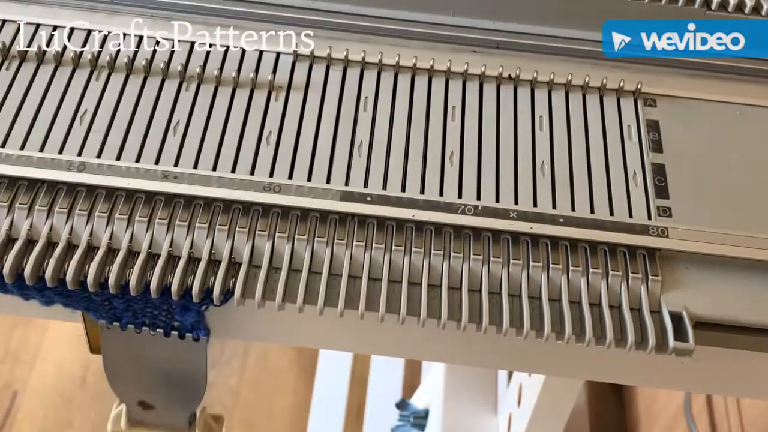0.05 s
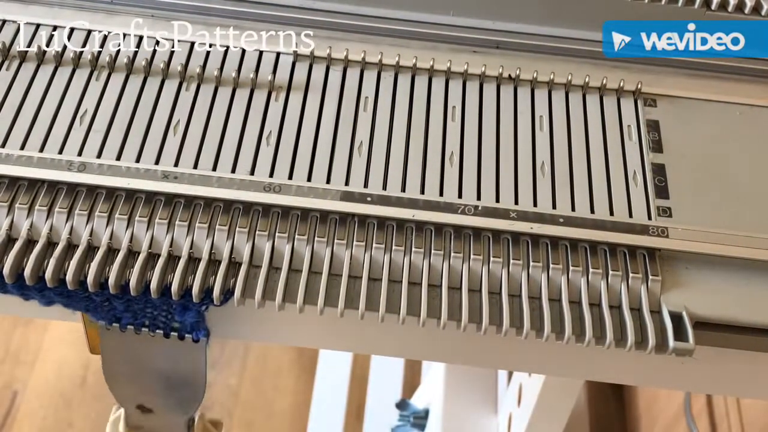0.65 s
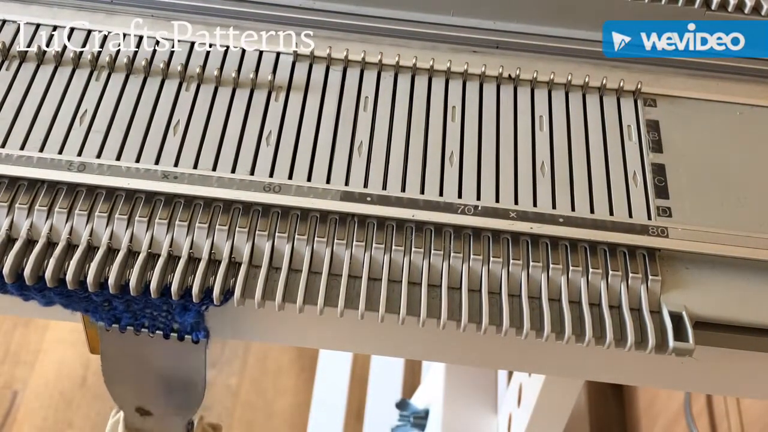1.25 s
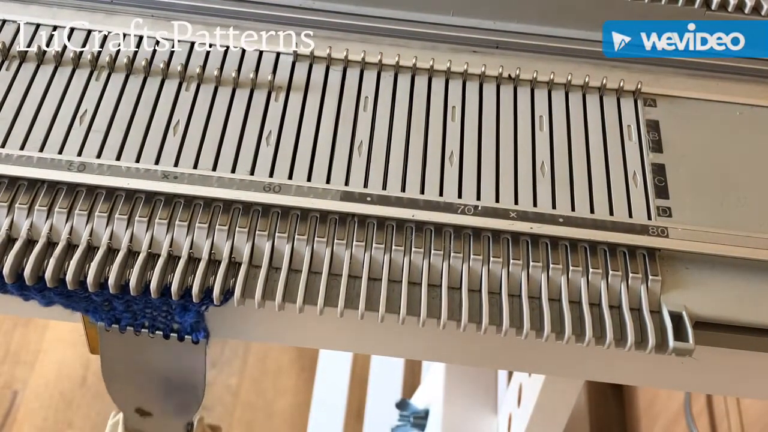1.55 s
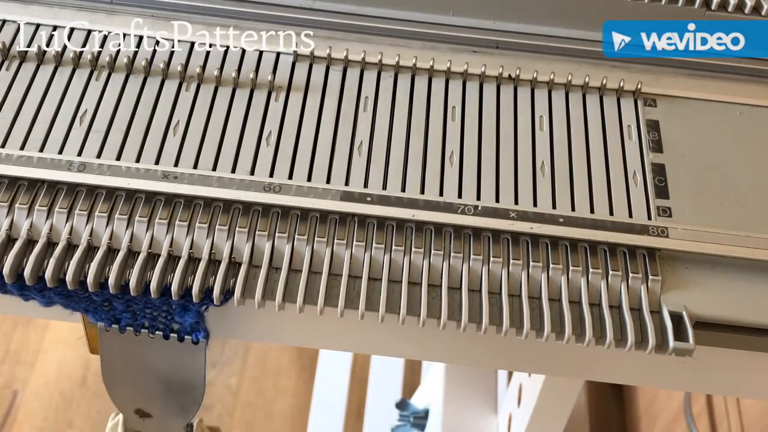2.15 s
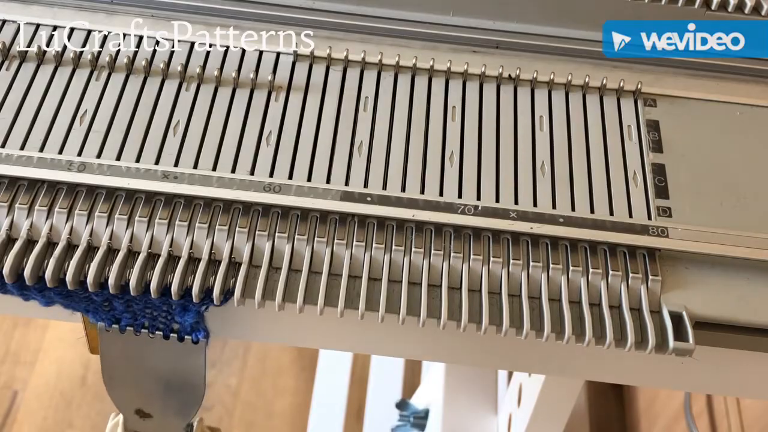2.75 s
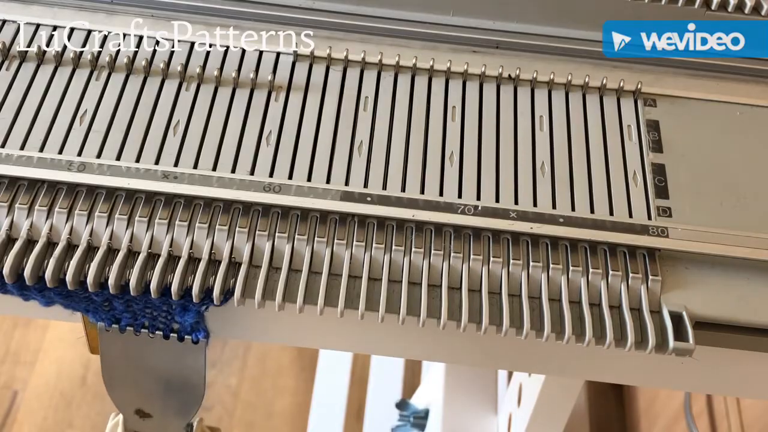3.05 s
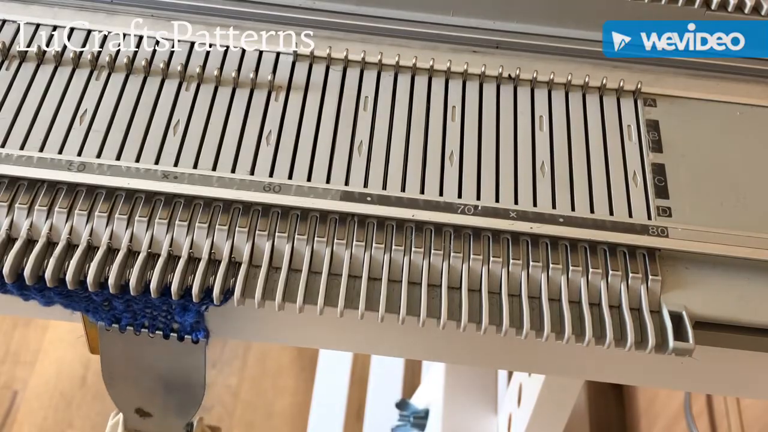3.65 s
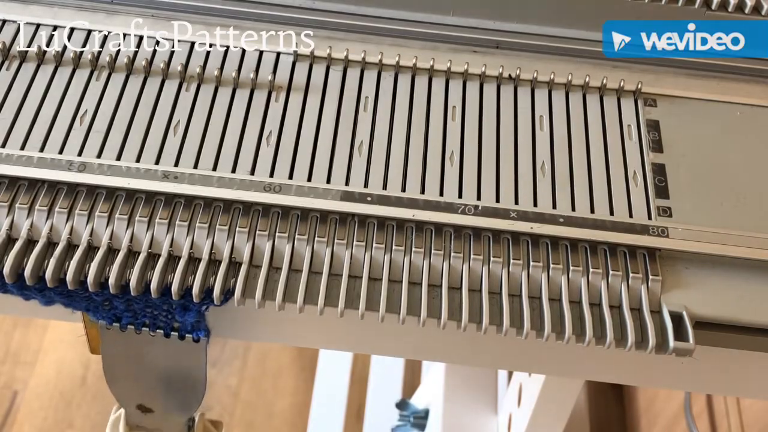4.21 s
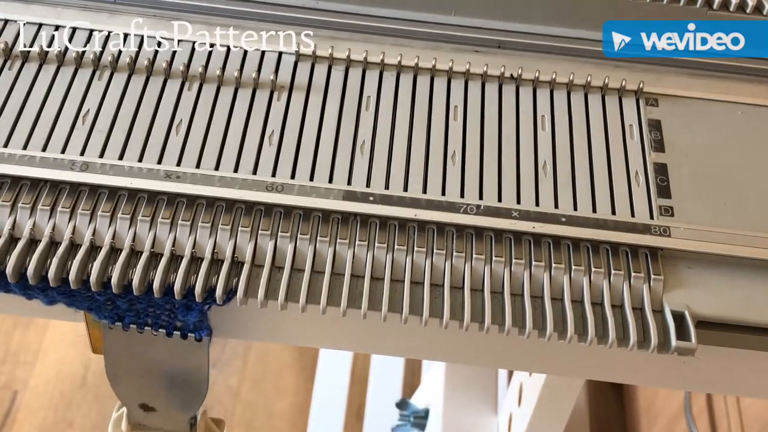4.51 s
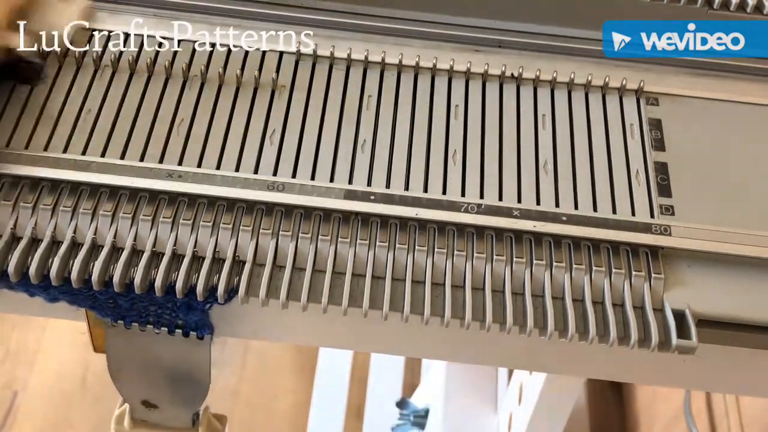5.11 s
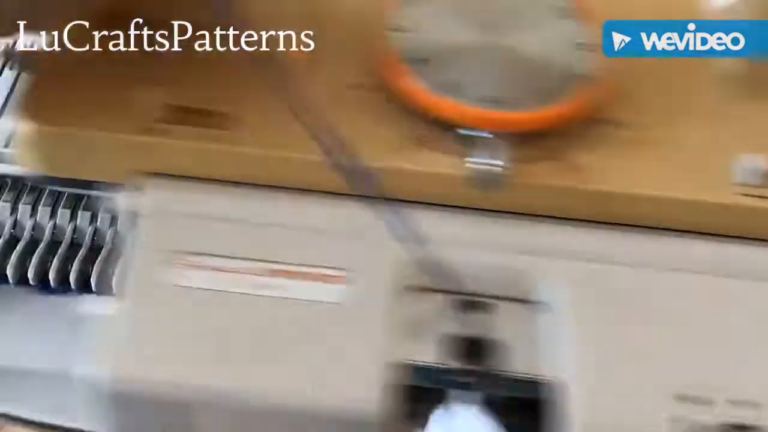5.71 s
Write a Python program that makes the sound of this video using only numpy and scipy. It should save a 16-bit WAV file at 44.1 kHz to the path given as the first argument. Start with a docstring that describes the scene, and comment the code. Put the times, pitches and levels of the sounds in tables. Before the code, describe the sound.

Heard from close up in a quiet room, a knitting machine is handled with faint sliding sounds and irregular little steel clicks from its needles. Near the end comes the loudest part: the carriage rasps over the needles twice, the second push shorter, while the hollow bed drones and the stand rumbles beneath. It finishes with a sharp click, a soft bump and a tiny metallic ping.

```python
"""A small, quiet room, one microphone close to a flatbed knitting machine. Hands shift and rub on the
machine, and steel latch needles rattle and click against a tool and their slots, knocking the hollow
bed. Then the carriage is pushed along in two strokes: its cams scrape over the row of needle butts,
the needles sing, and the bed drones under it while the stand rumbles."""
import sys
import numpy as np
from scipy import signal
from scipy.fft import rfft, irfft, next_fast_len
from scipy.io import wavfile
from scipy.ndimage import uniform_filter1d, map_coordinates

SR = 44100
rng = np.random.default_rng(int(sys.argv[2]) if len(sys.argv) > 2 else 0)


def digitize_waveform(pressure):
    """Quantize a signal to 16-bit integers and store it at the path in sys.argv[1].

    Rows of a 2-D input are taken as channels; values are limited to [-1, 1].
    """
    field = np.atleast_2d(pressure).T
    bounded = np.clip(field, -1, 1)
    quanta = np.round(bounded * 32767).astype(np.int16)
    wavfile.write(sys.argv[1], SR, quanta)


N = 263277


def amp(db):
    """Decibels to gain."""
    return 10 ** (np.asarray(db) / 20)


def unit(x):
    """Scale to rms 1."""
    return x / np.sqrt(np.mean(x ** 2) + 1e-20)


def along(points, hz):
    """Read a curve of (frequency_hz, value) points on a log-frequency axis."""
    point_hz, values = np.transpose(points)
    return np.interp(np.log(hz + 1), np.log(point_hz), values)


def hump(hz, centre_hz, height_db, width):
    """Gain of a broad bell on a log-frequency axis."""
    return amp(height_db * np.exp(-(np.log((hz + 1) / centre_hz) / width) ** 2))


def resonance(hz, centre_hz, width_hz):
    """Gain of a single resonance, 1 at its centre."""
    return 1 / np.sqrt(1 + ((hz - centre_hz) * 2 / width_hz) ** 2)


def peaks(hz, modes):
    """A flat gain with a peak at each (pitch_hz, width_hz, height_db)."""
    return 1 + sum((amp(db) - 1) * resonance(hz, centre, width) ** 2 for centre, width, db in modes)


def filtered(x, response):
    """Pass x through a complex response of frequency."""
    padded = next_fast_len(len(x) + 8192)
    hz = np.fft.rfftfreq(padded, 1 / SR)
    return irfft(rfft(x, padded) * response(hz), padded)[:len(x)]


def coloured(x, spectrum):
    """Shape x by a spectrum, at rms 1."""
    return unit(filtered(x, lambda hz: amp(along(spectrum, hz))))


def ring(force, modes):
    """A body rings in its modes, scaled so that a white force keeps its power."""
    def response(hz):
        total = sum((-1) ** k * amp(db) * 1j * hz * width / (pitch ** 2 - hz ** 2 + 1j * hz * width)
                    for k, (pitch, width, db) in enumerate(modes))
        return total / np.sqrt(np.mean(np.abs(total) ** 2))
    return filtered(force, response)


def grit(size, per_s):
    """Micro-impacts of uneven strength, at rms 1."""
    hits = rng.random(size) < per_s / SR
    return unit(hits * rng.choice([-1, 1], size) * amp(2.5 * rng.standard_normal(size)))


def wobble(knots_per_s):
    """A smooth random curve."""
    knots = rng.standard_normal(int(N * knots_per_s / SR) + 4)
    return map_coordinates(knots, [np.arange(N) * knots_per_s / SR])


def held(start_s, end_s, attack_s=0.021, release_s=0.018):
    """Envelope of a movement: it rises before the start, holds, and dies after the end."""
    t = np.arange(N) / SR
    return np.exp(-np.maximum(start_s - t, 0) / attack_s - np.maximum(t - end_s, 0) / release_s)


def movements(rows):
    """One gain curve for each level column of a (start_s, length_s, level_db, ...) table."""
    starts, lengths, *levels_db = np.transpose(rows)
    shapes = np.array([held(start, start + length) for start, length in zip(starts, lengths)])
    return amp(levels_db) @ shapes


def room_tone():
    """The quiet air of the room, mostly low noise."""
    # spectrum of the air: frequency_hz, relative_db
    air_spectrum = [(15, -59), (25, -17), (65, -7), (130, -6.5), (174, -3), (300, -10), (600, -15.5),
                    (1500, -24.5), (4000, -29), (10000, -33), (15800, -30.5)]
    return amp(-69.5) * coloured(rng.standard_normal(N), air_spectrum)


def room(x):
    """Add the small room's diffuse tail: in each band the stored energy dies at its own speed."""
    # reverberation times: frequency_hz, t60_s
    decay_times = [(120, 0.62), (800, 0.29), (2000, 0.33), (5000, 0.31), (13000, 0.15)]
    hz, t, spectra = signal.stft(x, SR, nperseg=256)
    lag_s = t[t < .6]
    build_up = 1 - np.exp(-lag_s / 0.0041)
    decay = (amp(-60 * lag_s / along(decay_times, hz)[:, None]) * build_up) ** 2
    decay /= decay.sum(axis=1, keepdims=True)
    energy = signal.fftconvolve(np.abs(spectra) ** 2, decay, axes=1)[:, :len(t)]
    scatter = signal.stft(rng.standard_normal(N), SR, nperseg=256)[2]
    band_gain = np.sqrt(np.abs(energy) / np.mean(np.abs(scatter) ** 2))
    tail = signal.istft(band_gain * scatter, SR, nperseg=256)[1]
    return x + amp(-5.5) * tail[:N]


def hands():
    """Hands slide, rub and bump on the machine; gives hiss, force on the bed, force on the stand."""
    # hands and carriage shifting against the machine: start_s, length_s, rub_rel_db, bump_rel_db
    rubs = [(0.02, 0.016, -78, -55), (0.118, 0.075, -55.5, -45), (0.39, 0.037, -52, -50),
            (0.49, 0.14, -59.5, -61.5), (0.8, 0.093, -67, -73), (0.93, 0.034, -61, -60),
            (1.06, 0.048, -65.5, -66), (2.26, 0.041, -61.5, -63), (3.885, 0.018, -59.5, -44.5),
            (4.17, 0.099, -63, -72), (4.262, 0.014, -50.5, -39), (5.12, 0.032, -57, -46),
            (5.185, 0.012, -64, -41.5), (5.66, 0.069, -51, -42.5), (5.77, 0.09, -41, -44.5),
            (5.9, 0.022, -57, -41)]
    # smooth slides along the bed and its rail: start_s, length_s, level_db
    slides = [(0.16, 0.062, -64.5), (0.42, 0.31, -74.5), (0.765, 0.14, -62.5), (1.07, 0.08, -74.5),
              (4.21, 0.054, -62.5), (5.19, 0.033, -63), (5.245, 0.065, -47.5), (5.76, 0.11, -47.5)]
    # spectrum of sliding surfaces: frequency_hz, relative_db
    hiss_spectrum = [(40, -70), (600, -22), (1600, -2), (2800, 2), (4400, 2.5), (7000, -1.5), (11000, -5.5),
                     (15800, -9)]
    rub, bump = movements(rubs)
    hiss = movements(slides)[0] * coloured(rng.standard_normal(N), hiss_spectrum)
    on_bed = amp(-5) * rub * grit(N, per_s=3000)
    on_stand = amp(-8) * bump * grit(N, per_s=1400)
    return np.array([hiss, on_bed, on_stand])


def needle_ring(size, ring_hz, ring_db):
    """A touched needle rings at one mode, with a cluster above it and its own scatter of weak ones."""
    # spectrum of a steel click: frequency_hz, relative_db
    steel_spectrum = [(40, -70), (300, -5), (900, 1.5), (1700, 0.5), (4500, -0.5), (7000, -1.5),
                      (11000, -5.5), (15800, -8.5)]
    ripple_db, spacing_hz = 3, 220.4

    def response(hz):
        mode = 1 + max(amp(ring_db) - 1, 0) * resonance(hz, ring_hz, width_hz=600) ** 2
        cluster = hump(hz, 1.35 * ring_hz, .7 * ring_db, width=.3) - 1
        scatter = map_coordinates(rng.standard_normal(400), [hz / spacing_hz], mode="wrap")
        return amp(along(steel_spectrum, hz)) * (mode + cluster) * amp(ripple_db * scatter)
    return unit(filtered(grit(size, per_s=8000), response))


def needle_clicks():
    """Each touch is a short, soft-edged steel click; gives steel sound, force on bed, force on stand."""
    # needles meeting tool and slots: peak_s, steel_db, knock_rel_db, edge_s, ring_hz, ring_db, knock_hz
    touches = [(0.125, -70, -52, 0.01, 3500, -5, 353), (0.243, -62, -69, .012, 10500, 7, 400),
               (0.334, -53, -53.5, 0.014, 3800, -2, 302), (0.365, -56.5, -58, 0.014, 3200, 6, 600),
               (0.535, -65.5, -71, .022, 4200, 3, 900), (0.628, -61.5, -53.5, 0.0086, 4500, -1, 338),
               (0.68, -63.5, -78, .012, 9400, 10, 800), (1.269, -38.5, -34.5, 0.011, 11200, 8, 1010),
               (1.867, -69, -63.5, .009, 7600, 3, 1320), (2.077, -77, -67, 0.013, 11000, 6, 500),
               (2.213, -72, -69, .008, 7700, 6, 785), (2.331, -47, -68, 0.0096, 7030, 21, 800),
               (2.365, -67, -40, 0.0068, 6800, 0, 660), (2.443, -56, -54, 0.011, 6800, 0, 800),
               (2.499, -52.5, -48.5, .011, 7200, 5, 1000), (2.529, -50.5, -43, 0.0094, 5100, -1, 815),
               (2.656, -48.5, -47, 0.011, 4280, 1.5, 790), (2.702, -55.5, -56.5, 0.0083, 11100, 7, 1100),
               (2.911, -72.5, -72, .007, 11500, 14, 800), (3.102, -61, -55.5, 0.007, 3400, 6, 590),
               (3.22, -72, -74, 0.0097, 11300, 13, 800), (3.476, -73, -63, 0.013, 6200, 2, 800),
               (3.676, -50.5, -44.5, 0.0093, 7500, 0, 540), (3.691, -47.5, -55, .009, 7770, 17, 815),
               (3.73, -52, -39, 0.0076, 6000, -8, 550), (3.755, -46.5, -54, 0.0085, 3670, 5.5, 400),
               (3.83, -56.5, -48, 0.0077, 3400, 5, 586), (3.997, -66, -74, 0.0097, 14500, 17, 800),
               (4.067, -52, -45.5, 0.0077, 2320, 11.5, 570), (4.288, -34.5, -43, 0.011, 7300, 7.5, 716),
               (4.351, -35.5, -41, 0.0064, 10500, 1, 600), (4.379, -38.5, -27, 0.0077, 1500, 14, 1440),
               (4.565, -37, -34.5, .013, 7000, -3, 600), (5.487, -34, -26, 0.0083, 9000, 6, 890),
               (5.693, -31, -38.5, .007, 4400, 8, 800), (5.855, -47.5, -60, .006, 3400, 37, 900)]
    bed_share_db = -11.5
    size = SR // 2
    t = (np.arange(size) - size // 2) / SR
    layers = np.zeros((3, N + size))
    for peak_s, steel_db, knock_db, edge_s, ring_hz, ring_db, knock_hz in touches:
        envelope = np.exp(1 - np.sqrt(1 + (t / edge_s) ** 2))
        steel = needle_ring(size, ring_hz, ring_db)
        # bed and stand take the blow at the peak of the click
        blow = np.exp(-(t / (1.84 * edge_s)) ** 2)
        knock = filtered(blow * grit(size, per_s=4400),
                         lambda hz: hump(hz, knock_hz, height_db=10, width=0.54))
        thud = filtered(blow * grit(size, per_s=4000),
                        lambda hz: hump(hz, knock_hz / 2.88, height_db=7.5, width=0.45))
        stand_share_db = -9 - 7.5 * np.log2(knock_hz / 557)  # more for soft, low blows
        span = slice(round(peak_s * SR), round(peak_s * SR) + size)
        layers[0, span] += amp(steel_db) * envelope * steel
        layers[1, span] += amp(knock_db + bed_share_db) * knock
        layers[2, span] += amp(knock_db + stand_share_db) * thud
    return layers[:, size // 2:][:, :N]


def pushed(full_db, growth):
    """Gain of a carriage layer: full_db at a full push, changing by growth dB for each dB of push."""
    # the two carriage strokes, each a curve of the push: time_s, push_db
    strokes = [
        [(4.31, -49), (4.368, -36), (4.602, -36.5), (4.658, -28), (4.78, -26.5), (4.87, -31.5), (5.012, -28),
         (5.074, -36.5), (5.13, -69)],
        [(5.34, -49), (5.382, -32), (5.42, -25.5), (5.462, -25), (5.528, -28.5), (5.594, -27), (5.624, -30.5),
         (5.66, -45), (5.675, -48)],
    ]
    full_push_db = -28
    t = np.arange(N) / SR
    gain = np.zeros(N)
    for stroke in strokes:
        time_s, push_db = np.transpose(stroke)
        excess_db = np.interp(t, time_s, push_db) - full_push_db
        gain += held(time_s[0], time_s[-1]) * amp(full_db + growth * excess_db)
    return gain


def passing_needles(x, ripple_db=1.8):
    """Narrow resonances come and go in x as needle after needle passes the cams."""
    spectra = signal.stft(x, nperseg=512)[2]
    scatter = uniform_filter1d(rng.standard_normal(spectra.shape), size=2, axis=0)
    scatter = uniform_filter1d(scatter, size=12, axis=1)
    rippled = spectra * amp(ripple_db * unit(scatter))
    return unit(signal.istft(rippled, nperseg=512)[1][:N])


def cam_scrape():
    """The steel cams drag over many needle butts at once and ring with the tiny impacts."""
    # spectrum of the scrape: frequency_hz, relative_db
    scrape_spectrum = [(40, -72), (300, -18), (900, 5), (1600, -1.5), (2600, -3.5), (4800, -2),
                       (7300, -4.5), (10500, -4.5), (12700, -1), (14000, -4), (15800, -3.5)]
    # resonances of the needles, heard in the scrape: pitch_hz, width_hz, height_db
    needle_modes = [(2310, 97, 4.5), (3090, 79, 4), (3620, 140, 4), (6530, 300, 1), (12700, 180, -2)]
    scrape = coloured(grit(N, per_s=12000), scrape_spectrum)
    ringing = filtered(scrape, lambda hz: peaks(hz, needle_modes))
    return pushed(full_db=-27.5, growth=1.15) * passing_needles(ringing)


def singing_needles():
    """Under the carriage, many needles sing at nearly the same high mode."""
    # flares as the first stroke ends and the second begins: start_s, length_s, level_db
    flares = [(5.0, 0.056, -43.5), (5.39, 0.068, -45)]
    gain = pushed(full_db=-45, growth=1.4) + movements(flares)[0]
    singing = filtered(rng.standard_normal(N), lambda hz: resonance(hz, 9000, width_hz=900) ** 2)
    return gain * unit(singing)


def carriage():
    """The carriage rides over the needles; gives steel sound, force on the bed, force on the stand."""
    # resonances of its hollow shell: pitch_hz, width_hz, height_db
    shell_modes = [(420, 23, 3.7), (785, 55, 5), (920, 40, 5), (1265, 22, 1.9), (1630, 50, 3.5)]
    drag = amp(.8 * wobble(knots_per_s=45))  # uneven as needles enter and leave
    steel = drag * cam_scrape() + singing_needles()
    shell = filtered(grit(N, per_s=2300), lambda hz: peaks(hz, shell_modes))
    clatter = pushed(full_db=-35.5, growth=0.75) * drag * shell
    # its weight shakes the stand's lowest modes
    weight = filtered(grit(N, per_s=1900), lambda hz: hump(hz, centre_hz=68, height_db=4, width=0.3))
    rumble = pushed(full_db=-40.5, growth=0.33) * weight
    return np.array([steel, clatter, rumble])


def bed_and_stand(on_bed, on_stand):
    """The hollow needle bed and its stand ring with the forces on them."""
    # strong modes of the bed: pitch_hz, width_hz, relative_db
    bed_modes = [(178.2, 9.5, 9.5), (241, 33, -2.5), (374.7, 20.6, 0), (430, 37, 1), (510.3, 53, 1.5),
                 (618.3, 29, 2.5), (722, 108, -2.5), (817, 19, 2.5), (927, 36, -2), (1008.5, 24, 4.5),
                 (1056, 56, -0.5), (1149.6, 24, 1), (1290, 154, -7.5), (1548, 69, -3.5), (1660, 26, -4.5),
                 (1817, 23, -14), (1885, 130, -9), (3104, 75, -11.5)]
    # spectrum of the bed's many weak modes in between: frequency_hz, relative_db
    panel_spectrum = [(20, -50), (100, -9), (300, 4), (900, -1.5), (1500, -10), (3000, -2), (8000, -14)]
    # modes of the stand: pitch_hz, width_hz, relative_db
    stand_modes = [(58.5, 21, -16.5), (74, 9.9, -10), (127.2, 14.3, 1), (179.6, 10.6, -1.5), (265, 56, -8)]
    panels = amp(1) * filtered(on_bed, lambda hz: amp(along(panel_spectrum, hz)))
    return ring(on_bed, bed_modes) + panels + ring(on_stand, stand_modes)


def scene():
    """Needles, carriage and hands all ring the same bed and stand, close up over the room tone."""
    layers = needle_clicks() + carriage() + hands()
    steel, on_bed, on_stand = [room(layer) for layer in layers]
    machine = steel + bed_and_stand(on_bed, on_stand)
    return (amp(1) * machine + room_tone())[None]


def record(dry):
    """One small microphone: it loses the deepest bass, and the treble ends at a steep band limit."""
    low_cut_hz, top_hz = 30, 15830

    def response(hz):
        low_cut = hz ** 2 / (hz ** 2 + low_cut_hz ** 2)
        high_cut = .5 - .5 * np.tanh((hz - top_hz) / 40)
        return low_cut * high_cut
    return filtered(dry[0], response)[None]


dry = scene()
out = record(dry)
digitize_waveform(out)
```